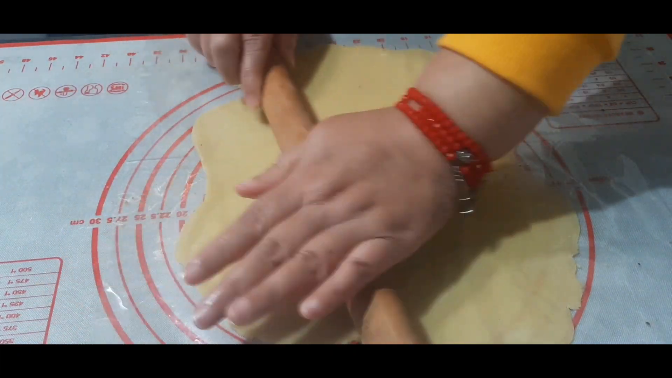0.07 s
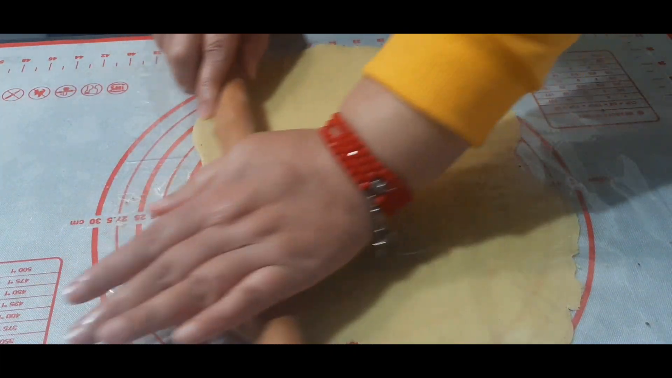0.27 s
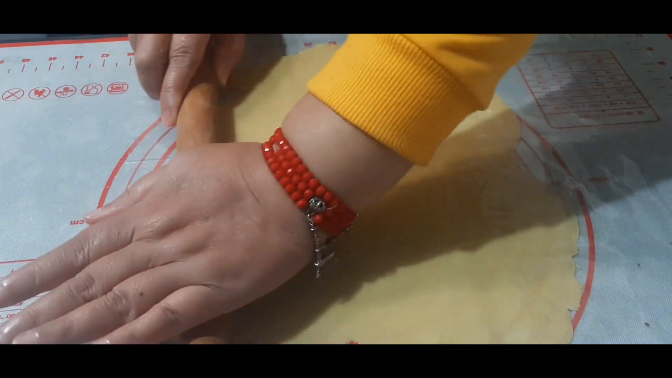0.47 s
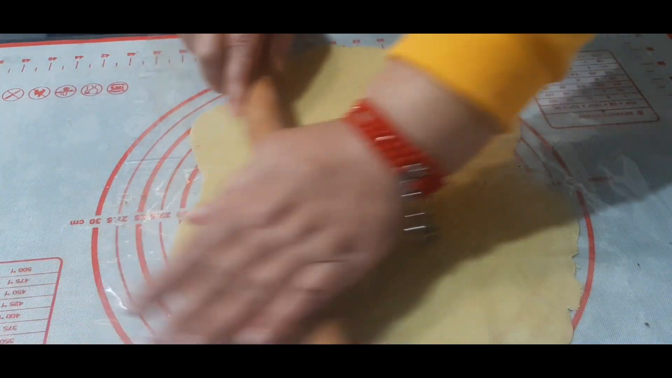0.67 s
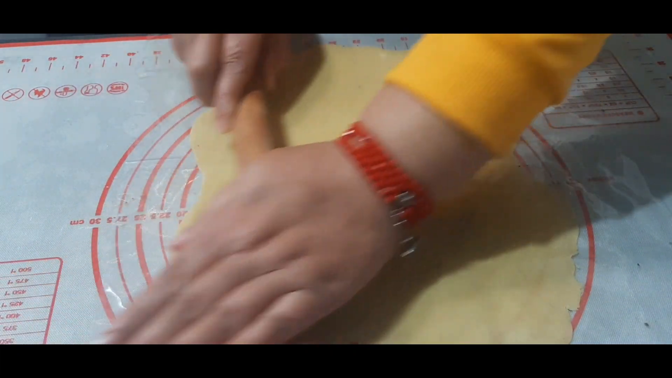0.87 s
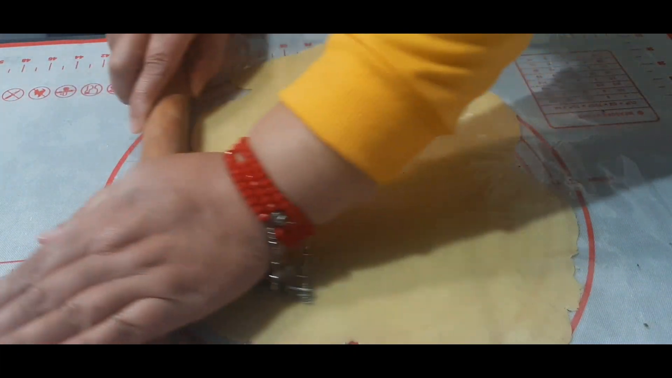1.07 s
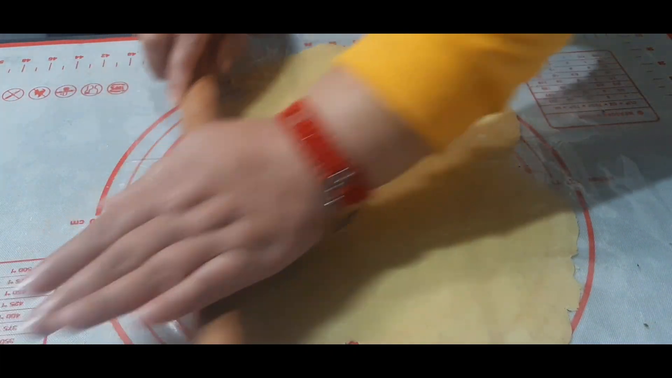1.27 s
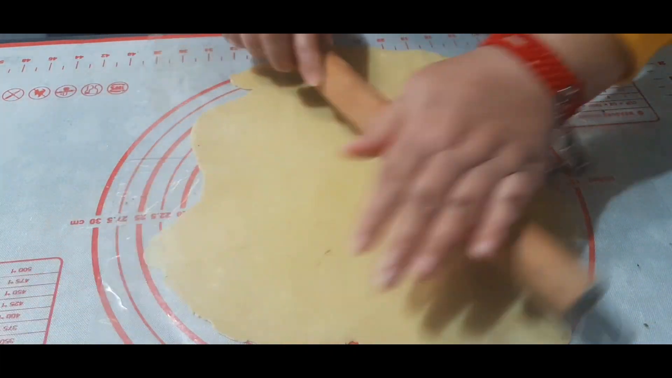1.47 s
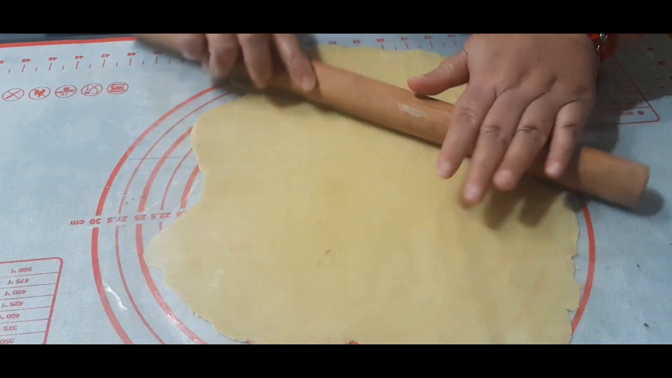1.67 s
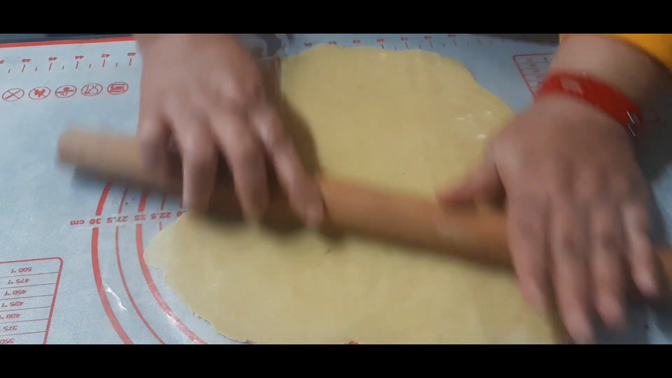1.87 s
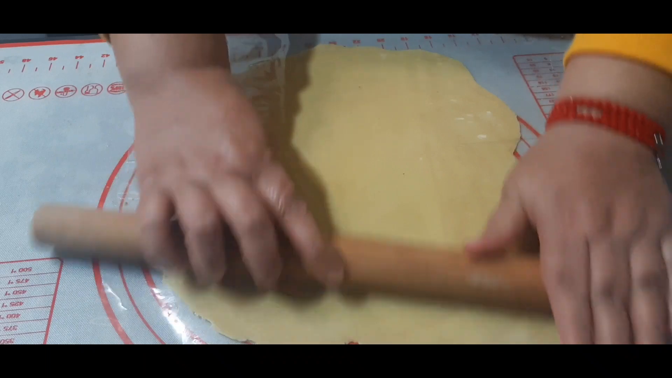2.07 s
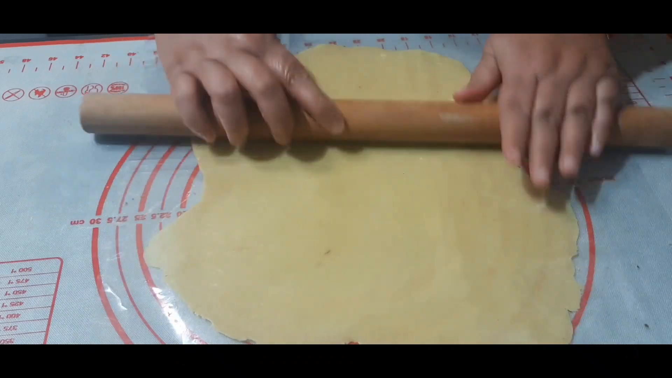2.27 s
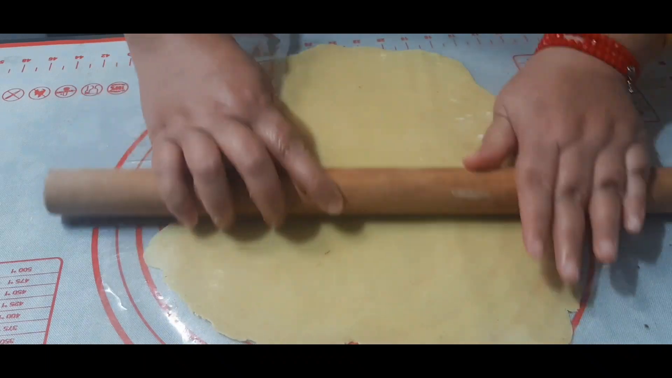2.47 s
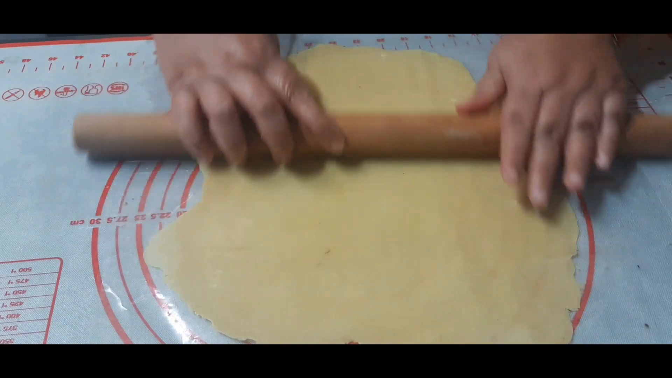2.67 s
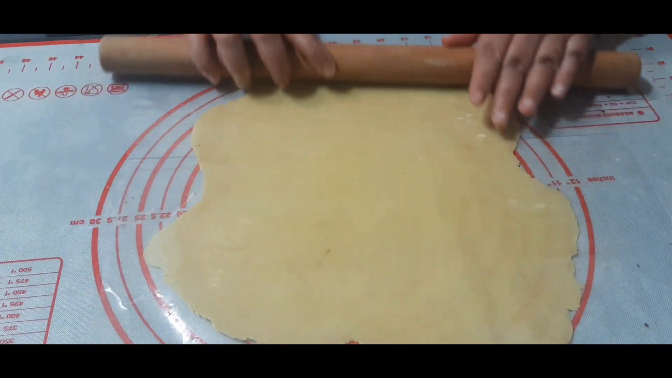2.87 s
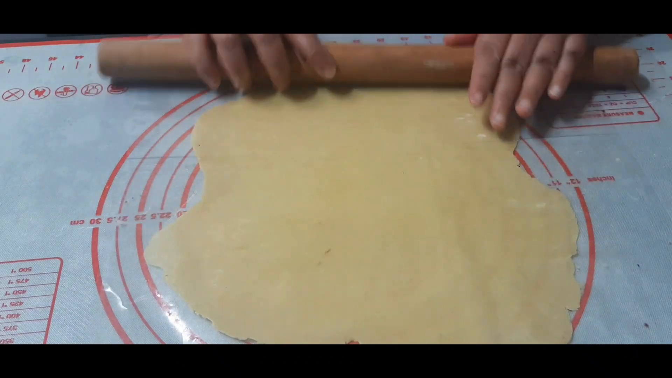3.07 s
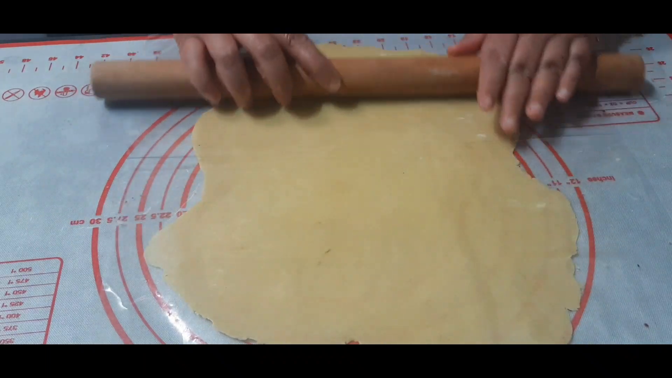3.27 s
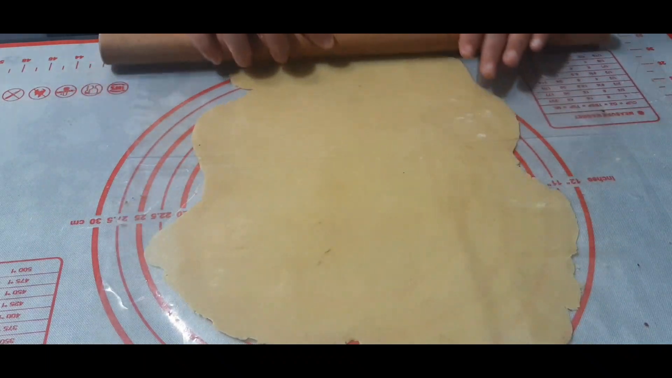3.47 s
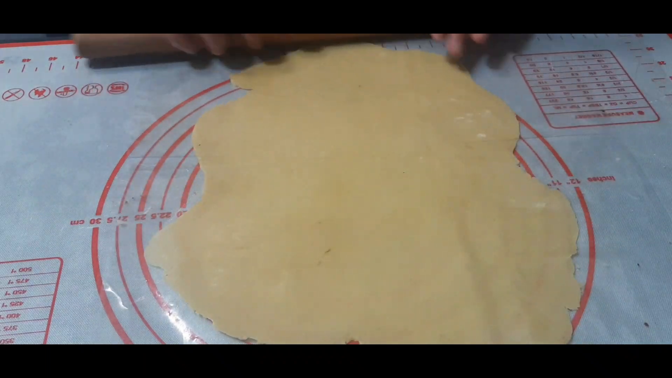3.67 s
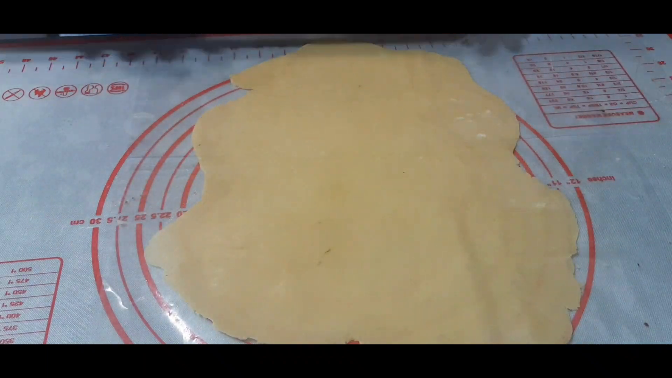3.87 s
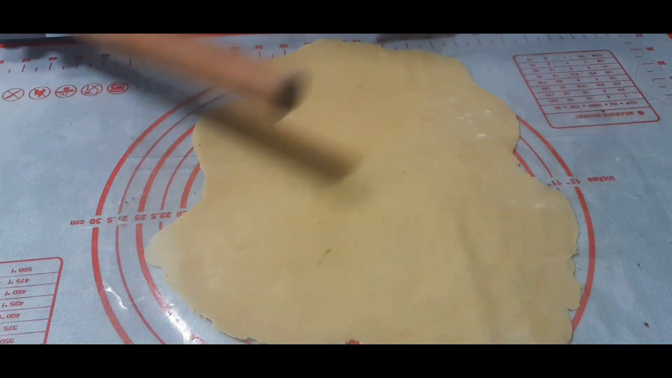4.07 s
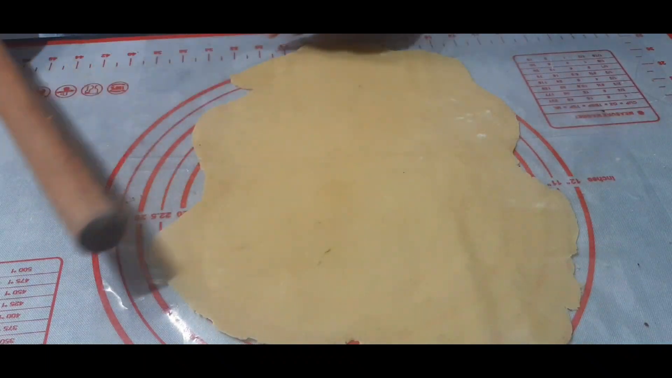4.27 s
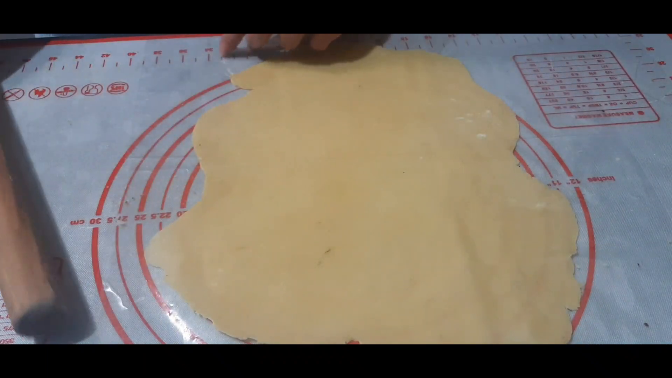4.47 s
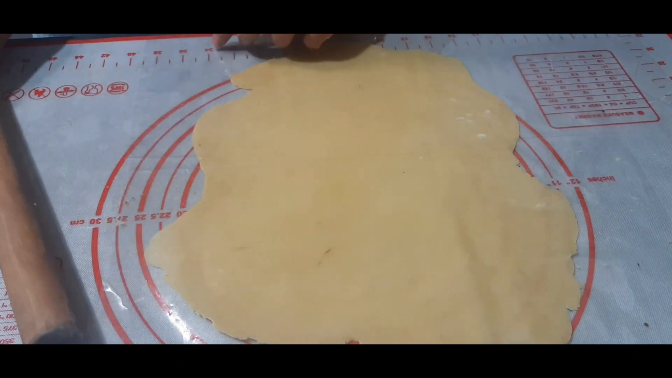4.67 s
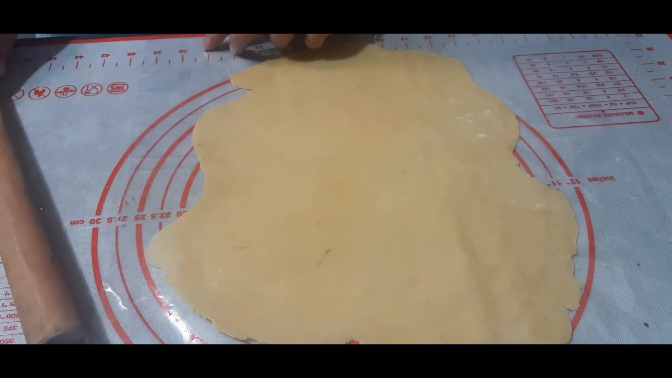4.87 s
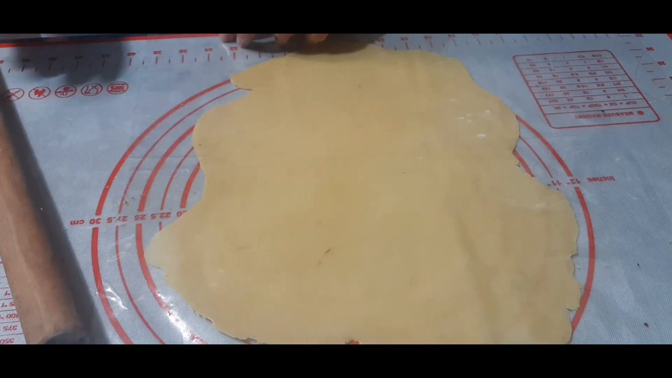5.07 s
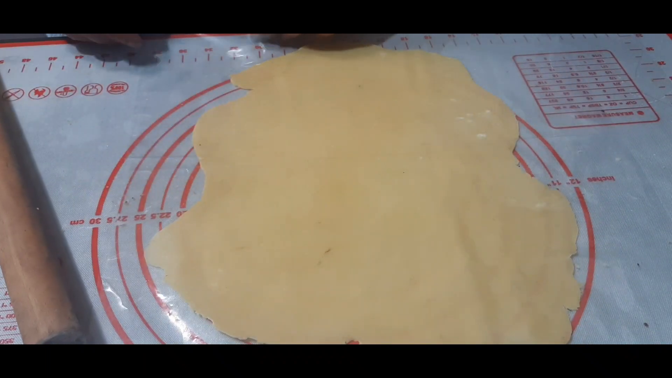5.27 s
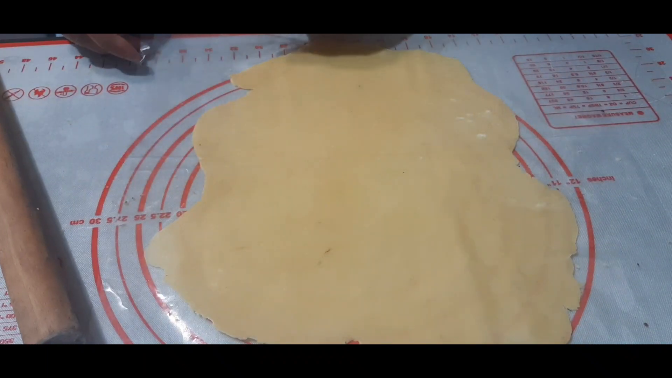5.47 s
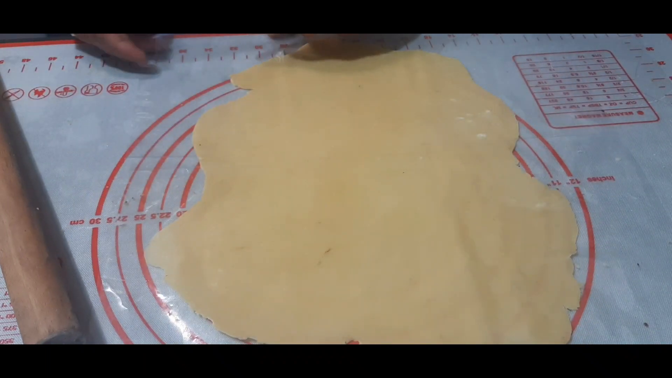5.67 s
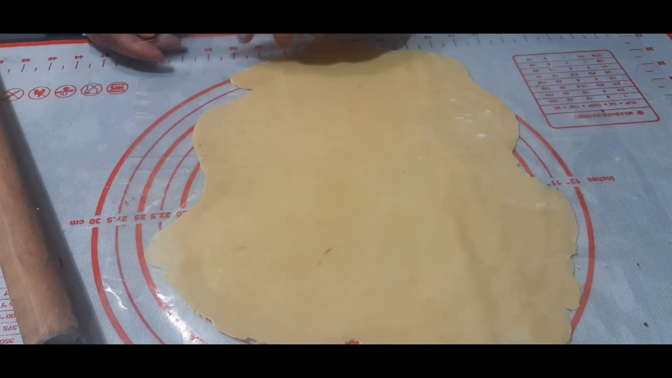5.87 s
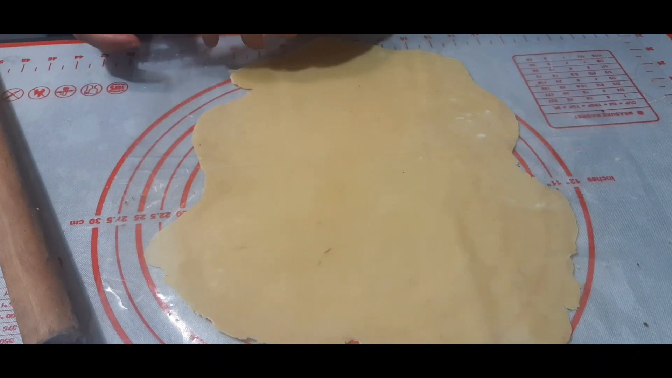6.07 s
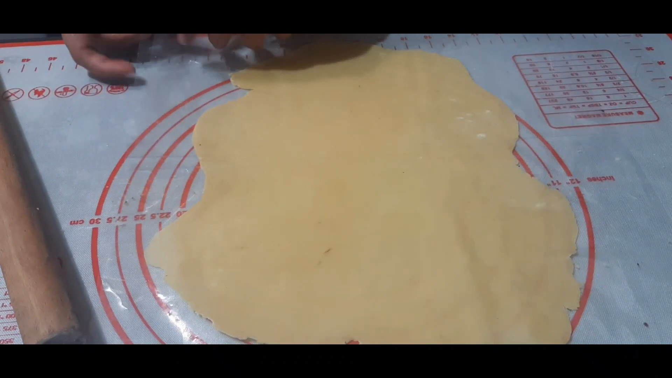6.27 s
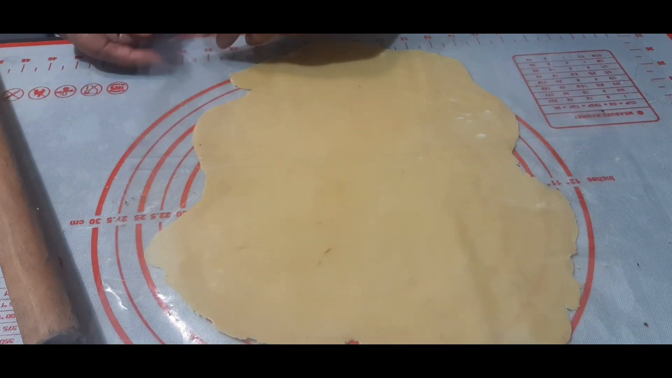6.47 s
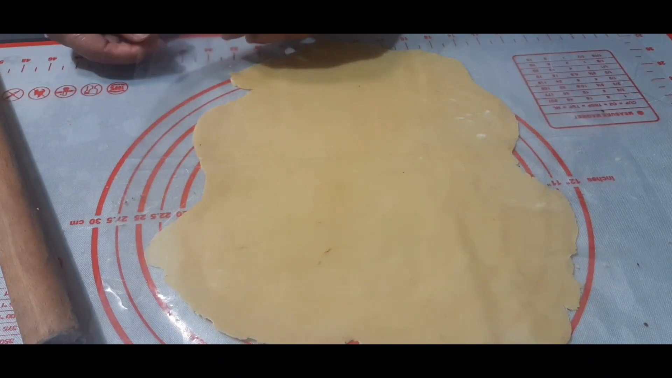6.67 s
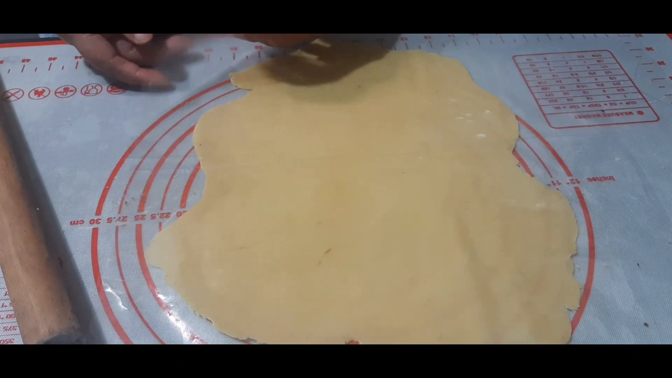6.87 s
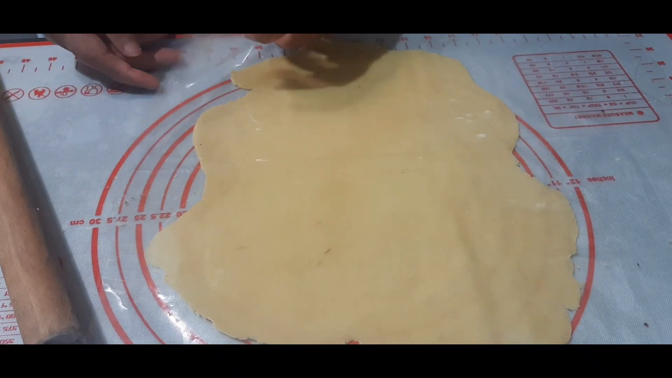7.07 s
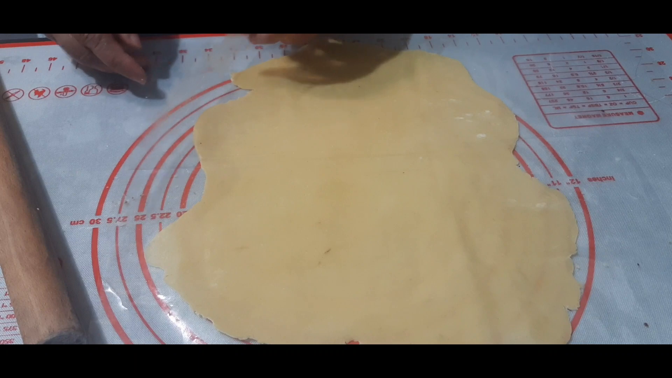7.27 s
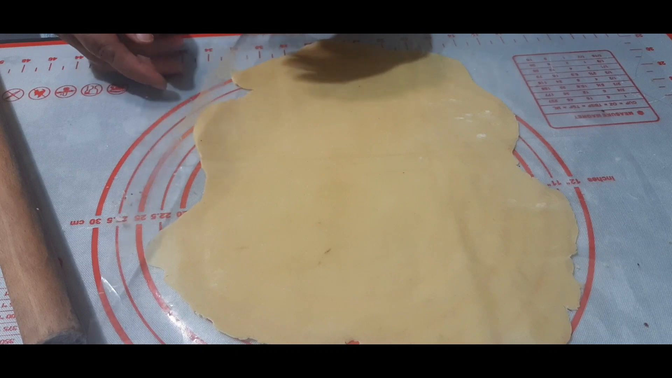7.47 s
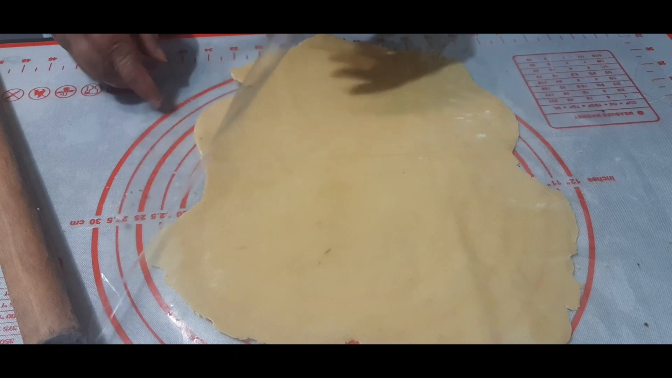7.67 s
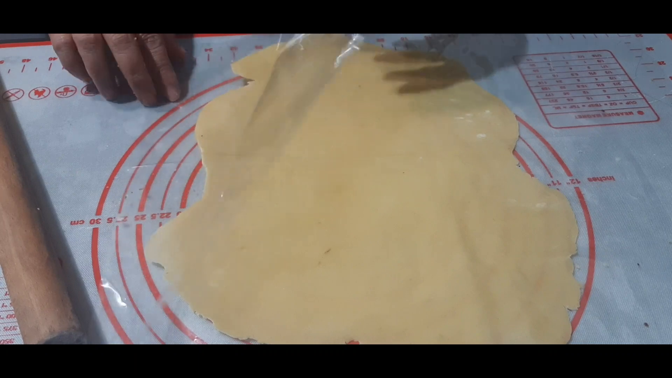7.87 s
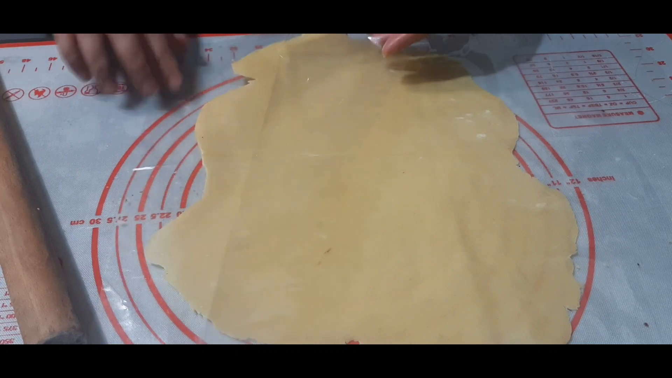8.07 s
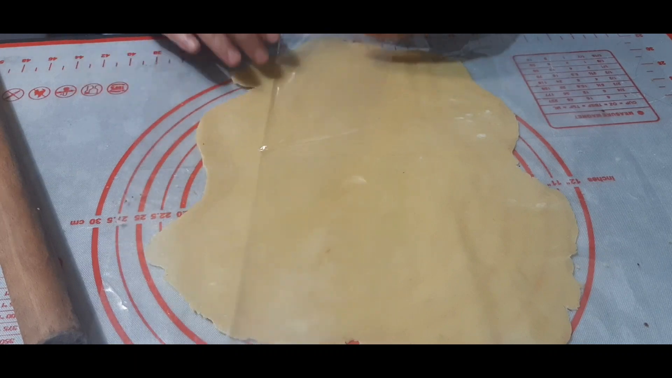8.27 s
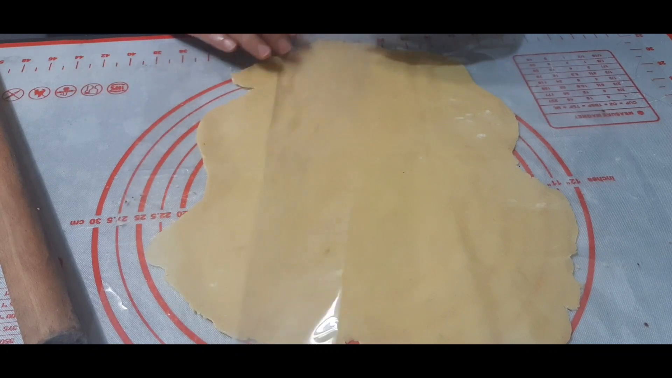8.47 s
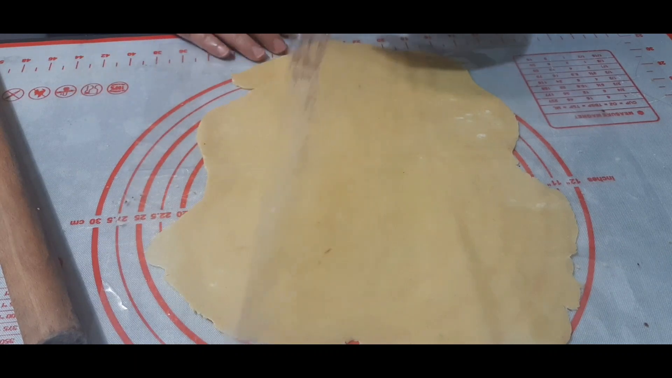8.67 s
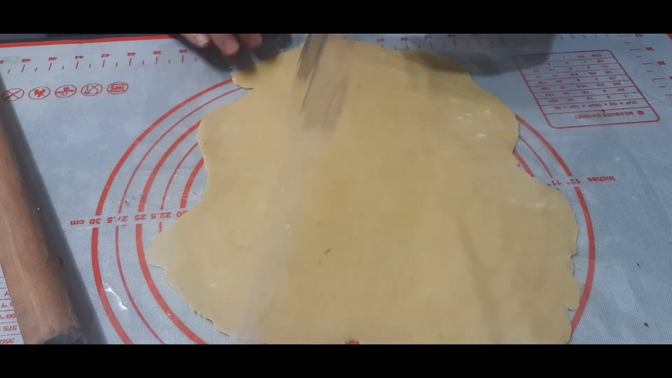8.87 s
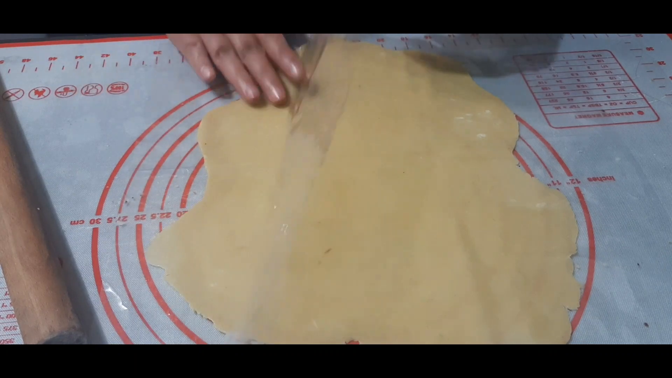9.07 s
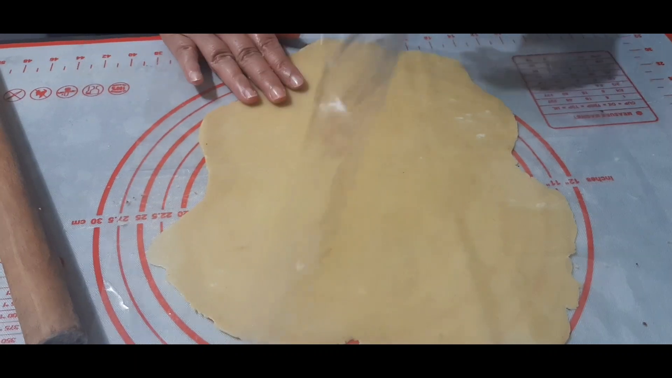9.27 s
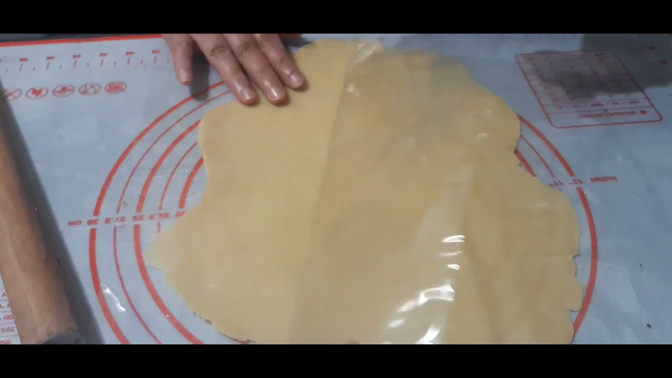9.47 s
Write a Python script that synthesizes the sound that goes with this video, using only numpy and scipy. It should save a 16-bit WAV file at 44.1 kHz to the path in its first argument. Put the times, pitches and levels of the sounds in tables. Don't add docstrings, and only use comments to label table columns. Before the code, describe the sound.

Close to a kitchen worktop, hands roll dough under plastic film: soft skin rubbing, thin hiss, small ticks and an occasional tiny bracelet ting. Sticky film crackles loose in short bursts. A wooden pin is put down with a bouncing, rattling knock, then the film is peeled with sharp irregular snaps and rustles. A faint fridge hum stays underneath in a small hard room, heard by a phone in stereo.

```python
import sys
import numpy as np
from scipy import signal
from scipy.fft import rfft, irfft, next_fast_len
from scipy.io import wavfile
from scipy.ndimage import uniform_filter1d, map_coordinates

SR = 44100
rng = np.random.default_rng(int(sys.argv[2]) if len(sys.argv) > 2 else 0)


def bounce(signal):
    frames = np.transpose(np.atleast_2d(signal))
    limited = np.clip(frames, -1, 1)
    pcm = np.round(limited * 32767).astype(np.int16)
    wavfile.write(sys.argv[1], SR, pcm)


def volts_from_decibels(level):
    exponent = np.asarray(level, float) / 20
    return 10 ** exponent


N = 419832

# start in seconds, peak in dB, centre in Hz, bright edge in dB.
LARGE_CREASES = [(5.2437, -32.5, 2480, -31), (5.3184, -27.5, 2350, -33), (5.4303, -22.5, 2340, -8),
                 (5.485, -43.5, 4730, -14), (5.725, -22.5, 1880, -30), (5.8294, -34.5, 1860, -22),
                 (5.852, -34, 1970, -38), (5.9353, -34, 2460, -20), (6.2164, -30.5, 4800, -22),
                 (6.3902, -27, 5000, -23), (6.4099, -23, 3750, -1.5), (6.6555, -22, 2830, -2),
                 (6.659, -25.5, 2450, 7), (6.816, -28, 2010, 4), (7.0563, -27.5, 2940, -5),
                 (7.341, -23, 4350, 6), (7.436, -27, 6900, -6), (7.5782, -22.5, 5470, -1),
                 (7.6811, -36.5, 1390, -2), (7.692, -29.5, 4720, -21), (7.9467, -31.5, 2350, -9),
                 (7.959, -33, 3980, -10), (8.2732, -30, 4440, -11), (8.3397, -35, 4370, -1),
                 (8.5371, -50, 1420, -21), (8.678, -31.5, 2620, -25), (8.6824, -24.5, 3320, -13),
                 (8.738, -27.5, 3540, 7), (9.0243, -26, 3700, 2.5), (9.0796, -23.5, 3730, -2.5),
                 (9.2931, -25, 3600, -18), (9.298, -36, 8000, 0), (9.2705, -34.5, 6000, -8),
                 (9.3778, -30.5, 1910, -23), (9.3805, -32, 3530, -21)]
# start in seconds, peak in dB, centre in Hz, bright edge in dB.
PIN_TICKS = [(0.136, -38, 12640, -9.5), (0.175, -31, 9300, 7), (0.2297, -36, 3800, -31),
             (0.2596, -46, 2530, -20), (0.279, -38.5, 5540, -22), (0.308, -46.5, 1540, 6),
             (0.5047, -47, 5100, -12), (0.5865, -46.5, 5030, -26), (0.746, -42, 3040, -10),
             (0.7768, -36.5, 11900, -14), (0.9247, -35.5, 2930, -23.5), (0.99, -40.5, 5700, -18.5),
             (1.0495, -32, 5930, 7), (1.086, -29.5, 10300, -18.5), (1.409, -63, 1490, -11),
             (1.5728, -27, 8200, 9), (1.6865, -51.5, 1500, -25), (1.879, -39.5, 1510, -25),
             (1.892, -43, 1420, -25), (1.741, -47, 14800, -20), (1.7619, -37, 1190, 4),
             (1.8187, -41.5, 1440, -18), (1.839, -43, 1500, -20), (3.1808, -50, 1470, -18.5),
             (3.2432, -42.5, 1700, -26), (3.483, -64, 2030, -9), (3.663, -45.5, 1190, -20),
             (4.326, -33.5, 5000, -14), (4.339, -40, 1300, -19), (4.346, -38, 1560, -21),
             (4.734, -40, 6450, -16)]
# start in seconds, peak in dB, centre in Hz.
DULL_FOLDS = [(1.58, -40, 6600), (3.217, -65, 7000), (3.249, -45, 10900), (5.332, -38.5, 2600),
              (6.374, -48, 5900), (6.938, -44.5, 1200), (6.754, -40, 11000), (6.798, -41, 11000),
              (5.42, -51, 11000), (6.5, -45, 12000), (6.537, -51.5, 1500), (8.749, -36, 6000),
              (7.35, -49, 5000), (8.268, -46, 3000), (8.282, -46, 4220), (8.545, -38, 2020),
              (9.11, -34, 2210), (5.016, -47, 1770), (5.0514, -38, 4770), (5.1173, -41.5, 3160),
              (5.284, -52, 4490), (5.519, -32, 2420), (5.6977, -42, 2060), (6.129, -39, 2300),
              (6.4474, -37, 1290), (6.8715, -32, 3620), (6.929, -36, 1220), (7.029, -38.5, 1100),
              (7.044, -36.5, 4130), (7.2397, -38.5, 1540), (7.3983, -39, 1520), (7.41, -35.5, 1520),
              (7.5266, -32.5, 4400), (7.843, -48, 1520), (8.0681, -38.5, 6200), (8.297, -37.5, 4200),
              (8.434, -40.5, 3450), (8.5713, -35, 3780), (8.607, -31.5, 3660), (8.6669, -38, 2680),
              (9.1005, -36, 1490), (9.163, -36, 1400), (9.227, -32, 4400), (9.2612, -38, 2100),
              (9.279, -33.5, 1330), (9.516, -44.5, 2020)]
# start in seconds, peak in dB, centre in Hz.
TINY_CREASES = [(1.616, -38.5, 1670), (1.7948, -34.5, 1150), (2.1443, -37, 1470), (2.155, -45, 1340),
                (2.1804, -50, 2050), (2.1866, -43, 2090), (2.1955, -30, 5140), (2.5594, -64, 1490),
                (2.6404, -46, 1490), (2.8816, -39, 1490), (2.8966, -40, 1570), (3.074, -49, 2030),
                (3.127, -45.5, 1470), (3.2036, -54, 1520), (3.386, -49, 4500), (3.543, -48, 2030),
                (3.5895, -46, 1490), (5.1687, -57, 1500), (5.1804, -44, 1490), (5.3004, -40, 1150),
                (5.4464, -47, 2410), (5.66, -40, 2140), (5.6673, -37, 2060), (5.7355, -20, 2080),
                (5.774, -23.5, 1490), (5.8444, -34, 2100), (6.0425, -34, 2130), (6.106, -47, 1530),
                (6.2436, -44, 1590), (6.366, -54, 1500), (6.4624, -52, 1390), (6.6082, -43, 1490),
                (6.6654, -33, 2370), (6.884, -42, 1150), (7.1276, -34, 1470), (7.224, -41, 1520),
                (7.5894, -44, 5280), (7.7977, -46, 4280), (7.858, -37, 1520), (7.924, -41, 2580),
                (7.9987, -35.5, 1520), (8.0421, -41, 4600), (8.0783, -30.5, 4050), (8.1964, -53, 4500),
                (8.4878, -44, 1430), (8.5556, -39, 1420), (9.2688, -44, 1440)]
# start in seconds, peak in dB, length in seconds, centre in Hz, width over centre.
TEARS = [(1.86, -34, 0.024, 7000, 4.74), (2.215, -25.5, 0.014, 5460, 0.9), (2.273, -26.5, 0.023, 3170, 3),
         (2.24, -44, .008, 9000, 1.7), (2.364, -33.5, 0.013, 5750, 2.9), (2.404, -25, 0.01, 5570, 1.15),
         (2.665, -28, 0.014, 5200, 1.1), (2.698, -23.5, 0.028, 4020, 3.3),
         (4.324, -39.5, 0.097, 3000, 1.36), (5.223, -36, 0.025, 2360, 2.1), (5.479, -45, 0.014, 5460, 1.7),
         (7.052, -29.5, 0.0082, 3450, 2.5), (7.069, -40, .035, 3980, 2), (8.477, -42.5, 0.022, 3300, 2),
         (8.533, -38, 0.0076, 3500, 2), (6.419, -30, 0.011, 4000, 2.3), (5.726, -32.5, 0.044, 2030, 0.33),
         (5.788, -42, 0.034, 2120, 0.32), (5.846, -35, 0.026, 2110, .4), (6.234, -37, 0.041, 3000, 2.2),
         (6.399, -39, 0.028, 3400, 1.5), (6.643, -33, 0.034, 1990, 10.3), (7.273, -35, 0.019, 1550, 3.2),
         (8.678, -42.5, 0.15, 2880, 3.6), (9.007, -43.5, 0.058, 5700, 1.9), (9.092, -34, 0.028, 2260, 3.8)]
# middle in seconds, level in dB, half length in seconds, centre in Hz.
BRUSHES = [(0.404, -63.5, 0.058, 5500), (0.947, -65, .05, 10300), (1.05, -67, 0.12, 5900),
           (1.6, -57.5, 0.016, 5700), (3.15, -65, 0.021, 7700), (3.125, -61.5, 0.032, 12000),
           (3.31, -67, 0.056, 620), (3.28, -67, 0.02, 7400), (4.9, -77, 0.026, 5100),
           (3.5, -61.5, 0.03, 11700), (5.2, -54, 0.017, 2850), (6.1, -57, .01, 14000),
           (4.5, -63, 0.0087, 5500), (5.95, -59.5, 0.038, 4300), (2.9, -76, 0.076, 650),
           (2.12, -72, 0.02, 1460)]
# time in seconds, level in dB.
HAND_EFFORT = [(0, -66.5), (1.1, -65.5), (1.3, -69.5), (1.55, -84.5), (1.75, -58.5), (2.06, -65),
               (2.3, -57.5), (2.57, -64), (3.02, -68.5), (3.7, -61), (4.28, -88), (4.96, -76.5),
               (5.27, -61), (7.62, -63), (8.24, -72), (8.72, -57), (8.99, -88), (9.52, -81)]
# peak in seconds, fade in seconds, level in dB.
PRESSES = [(1.07, 0.12, -68), (1.68, 0.39, -75.5), (1.9, 0.13, -63.5), (2.21, 0.21, -57.5),
           (2.43, 0.04, -53), (2.7, 0.28, -64.5), (3.3, 0.33, -73), (3.68, 0.12, -91), (4.55, 0.59, -64),
           (5.22, 0.2, -69.5), (6.06, 0.026, -71), (6.25, 0.08, -63.5), (7.07, 0.042, -54),
           (7.29, 0.2, -61), (7.5, 0.7, -66), (8.29, 0.09, -68), (8.49, 0.061, -85), (8.68, 0.052, -54.5),
           (9.1, 0.15, -55.5), (9.27, 0.14, -54)]
# frequency in Hz, density in dB per Hz.
SKIN_COLOUR = [(150, -11.5), (300, 0.5), (900, -9), (1500, -5.5), (2100, -6.5), (3200, -13.5),
               (6000, -16.5), (9000, -39), (16000, -23.5)]
# frequency in Hz, density in dB per Hz.
FILM_COLOUR = [(900, -41), (1500, -3), (2200, -10.5), (3500, -5), (6400, -0.5), (9000, -4.5), (13000, -3.5),
               (16500, -7)]
# time in seconds, left lag in samples.
HANDS_LAG = [(0, 1), (1.2, -5), (1.7, 1.5), (2.9, 1.5), (4, 0), (4.5, -7), (5, -5), (7, -5), (7.7, -1),
             (9.5, -1.5)]
# start in seconds, peak in dB, upper modes in dB, slap in dB.
PIN_KNOCKS = [(4.5200, -13.5, -2, -10), (4.531, -26.5, -7, -45), (4.557, -32.5, 4, -42.5),
              (4.5707, -16, -8.5, -43), (4.593, -18, -10, -43), (4.606, -20.5, -18.5, -36),
              (4.617, -29, -13, -37), (4.637, -31, -13, -38), (4.647, -10, -22, 4),
              (4.657, -20.5, -22, -10.5), (4.668, -23.5, -17, -12)]
# frequency in Hz, level in dB, decay (t60) in seconds.
WOOD_MODES = [(290, -30, 0.04), (355, -2, 0.04), (421.5, -1, 0.053), (510, -2.5, .03), (653, -2.5, .025),
              (755, -2, 0.024), (847, -6.5, 0.022), (966, -4, 0.04), (1246, -10, 0.064),
              (1420, -15.5, 0.014), (1680, -11, .025)]
# frequency in Hz, level in dB, decay (t60) in seconds.
UPPER_WOOD_MODES = [(1900, -7, .025), (2040, 2, .04), (2200, -7, .02), (2845, -2, .045), (2960, -8, .025)]
# centre in Hz, width in Hz, level in dB.
SLAP_BANDS = [(480, 357, 4.5), (886, 400, 0), (1700, 1020, 5.5), (3600, 1500, 9), (7200, 1100, 5.5)]
# start in seconds, peak in dB, pitch in Hz.
DOUGH_THUDS = [(1.617, -34.5, 238), (1.6231, -35, 290), (1.632, -53, 546), (1.66, -50, 480),
               (1.68, -38, 194), (2.244, -39, 330), (4.349, -38.5, 286), (5.448, -40, 408),
               (6.406, -37, 506), (6.655, -39, 618), (8.675, -38, 176)]
# start in seconds, peak in dB, lower mode in dB.
CHARM_TINGS = [
    (0.1751, -37.5, 3),
    (0.9348, -50, -20),
    (1.0859, -36, -10),
    (1.408, -62, 4),
    (2.414, -28, -8),
    (3.2503, -39.5, 3.5),
    (3.483, -61, -24),
    (4.3475, -59, -35),
]
# centre in Hz, width in Hz, level in dB.
PHONE_GAP = [(1150, 32, -15), (1490, 62, -0.5), (2060, 33, -3)]
# middle in seconds, level in dB, half length in seconds, pitch in Hz.
PALM_SLIDES = [
    (1.697, -60, 0.012, 1530),
    (3.15, -73, .02, 1490),
    (3.48, -70, .015, 2040),
    (3.55, -67, 0.013, 2050),
    (3.83, -69.5, 0.066, 1490),
    (4.37, -57, 0.014, 1530),
]
# frequency in Hz, t60 in seconds.
KITCHEN_T60 = [(100, 0.44), (400, 0.37), (2000, 0.5), (6000, 0.47), (15000, 0.38)]
# frequency in Hz, level in dB.
WALL_RETURN = [(300, -1), (700, 2), (2000, -2.5), (4000, -1.5), (8000, -2), (14000, -6.5)]
# frequency in Hz, left-right correlation.
PORT_LIKENESS = [(60, 0.75), (300, 0.81), (640, 0.49), (1400, 0), (15000, 0)]
# multiple of the shaft speed, level in dB.
SHAFT_ORDERS = [(3, -79.5), (4, -60.5), (5, -92), (6, -80), (8, -87.5), (10, -81), (30.5, -92)]
# frequency in Hz, density in dB per Hz.
AIR_COLOUR = [(15, -65), (25, -19.5), (107, -13), (194, -7.5), (247, -12.5), (434, -28.5), (484, -27),
              (851, -37.5), (1540, -29), (3100, -43.5), (5610, -36), (9100, -54.5), (15600, -32.5)]
# time in seconds, level in dB.
ROOM_MODE = [(0, -97), (4.2, -84.5), (5, -71), (9.52, -63.5)]
# peak in seconds, fade in seconds, level in dB.
WEIGHT_SHIFTS = [(.93, 0.096, -64), (1.64, 0.072, -58), (2.7, 0.13, -67), (3.07, 0.27, -73),
                 (4.6, 0.52, -61.5), (6.42, 0.16, -54), (6.95, 0.18, -71), (7.27, 0.092, -56),
                 (7.55, 0.2, -70), (8.7, 0.097, -59.5), (9.07, 0.15, -71), (9.41, 0.077, -61)]
# frequency in Hz, level in dB.
PORT_NOTCH = [(7600, 2), (8100, 0.5), (8500, -8.5), (9600, -6), (10800, 0), (12500, 1.5)]
# frequency in Hz, level in dB.
BAND_LIMITS = [(15, -30), (60, 0), (15750, 0), (15900, -32), (16650, -36), (16850, -70)]

TAUT_HZ = 5900


def crease(burst, hz, edge_db):
    edge = np.clip(edge_db, -26, 6)
    crack = unit(filtered(burst[0], lambda f: resonance(hz, 3.94 * hz)(f) ** 2))
    return unit(two_tone(burst, hz, 1.1, edge) + volts_from_decibels(-1.5) * crack)


def snaps(track, table, t60):
    t = np.arange(512) / SR
    for s, db, hz, edge_db in table:
        burst = 0.25 * rng.standard_normal((2, len(t))) * volts_from_decibels(-60 * t / t60)
        burst[:, 0] = rng.choice([-1, 1])
        late = rng.uniform(0.0002, 0.0012)
        snap = filtered(crease(burst, hz, edge_db), lambda f: 1 + 0.3 * np.exp(-2j * np.pi * f * late))
        gain = volts_from_decibels(db) / abs(snap).max()
        add(track[0], s, gain * snap, rng.normal(1, 2.5))
        jolt = (t == 0) * np.ones((2, 1))
        add(track[1], s, gain * crease(jolt, hz, edge_db))


def dull_edge(hz):
    return -10 + 9 * np.log2(hz / TAUT_HZ)


def all_creases():
    folds = np.zeros((2, 2, N + SR))
    snaps(folds, [(s, db + 2, hz, edge_db) for s, db, hz, edge_db in LARGE_CREASES], t60=0.008)
    snaps(folds, [(s, db + 2, hz, dull_edge(hz)) for s, db, hz in DULL_FOLDS], t60=0.008)
    snaps(folds, [(s, db - 7.5, hz, dull_edge(hz)) for s, db, hz in TINY_CREASES], t60=0.015)
    snaps(folds, PIN_TICKS, t60=0.011)
    return folds[..., :N]


def rips(track):
    for s, db, length, hz, share in TEARS:
        edge_db = 14.5 * np.log2(hz / TAUT_HZ) + 2.5 * share
        t = np.arange(round(2 * length * SR)) / SR
        rise = 0.0015 + 0.53 * length * (hz / TAUT_HZ) ** 2
        shape = np.minimum(t / rise, 1) * np.exp(-(t / length) ** 6)
        slip_db = 3 * np.minimum(rng.exponential(size=len(t)), 3)
        volley = shape * rng.standard_normal((2, len(t))) * volts_from_decibels(slip_db)
        add(track, s, volts_from_decibels(db - 17) * two_tone(volley, hz, share, edge_db), 2.5)


def swishes(track):
    for s, db, half, hz in BRUSHES:
        add(track, s - 2 * half, volts_from_decibels(db) * noise_swell(half, hz, 0.4 * hz))


def crackle(spectrum, rate, spread_db, clump):
    chance = rate / SR * np.exp(clump * np.clip(wobble(70), -2, 1.5))
    size = volts_from_decibels(spread_db * np.minimum(rng.exponential(size=N), 3))
    slips = (rng.random(N) < chance) * size * rng.choice([-1, 1], N)
    return unit(filtered(slips, lambda hz: volts_from_decibels(along(spectrum, hz))))


def ring(modes, detune):
    t = np.arange(SR // 5) / SR
    total = 0
    for hz, db, t60 in modes:
        level = volts_from_decibels(db + rng.uniform(-2, 2) - 60 * t / t60)
        total = total + level * np.sin(2 * np.pi * hz * rng.normal(1, detune) * t)
    return total


def slap_response(f):
    flat = sum((-1) ** k * volts_from_decibels(db) * resonance(hz, width)(f) ** 2 for k, (hz, width, db) in enumerate(SLAP_BANDS))
    return (flat + 1.16 * resonance(2400, 5000)(f)) / (1 + (f / 5600) ** 6)


def pin(track):
    t = np.arange(SR // 5) / SR
    for s, db, top_db, slap_db in PIN_KNOCKS:
        jolt = np.exp(-(t / 0.00006 - 3) ** 2) + 0.15 * rng.standard_normal(len(t)) * volts_from_decibels(-60 * t / 0.02)
        jolt = jolt + 2.04 * np.exp(-((t - 0.00061) / 0.00026) ** 2)
        slap = filtered(jolt, slap_response)
        rattle = unit(filtered(rng.standard_normal(len(t)), lambda f: resonance(700, 800)(f) ** 2))
        clatter = volts_from_decibels(-24 - 60 * t / 0.06) * rattle
        onset = np.minimum(t / 0.002, 1)
        shake = 1 + 0.5 * unit(uniform_filter1d(rng.standard_normal(len(t)), size=120))
        wood = ring(WOOD_MODES, 0.022) + volts_from_decibels(top_db) * shake * onset * ring(UPPER_WOOD_MODES, 0.022 / 3)
        wood = wood * np.sin(np.pi / 2 * np.minimum(t / 0.0007, 1)) ** 2
        knock = volts_from_decibels(-9.5) * wood + clatter * onset - volts_from_decibels(slap_db) * slap / abs(slap).max()
        add(track, s, volts_from_decibels(db) * knock, 1.8)


def thuds(track):
    t = np.arange(SR // 6) / SR
    for s, db, hz in DOUGH_THUDS:
        puff = unit(filtered(rng.standard_normal(len(t)), lambda f: resonance(1.6 * hz, 1.6 * hz)(f) ** 2))
        push = np.sin(2 * np.pi * hz * t) * volts_from_decibels(-60 * t * hz / 15)
        thud = push + 0.37 * puff * volts_from_decibels(-60 * t / 0.046)
        add(track, s, volts_from_decibels(db) * thud * (1 - np.exp(-t / 0.0013)), 1.2)


def charm(track):
    t = np.arange(SR // 4) / SR

    def cluster(hz, spread_hz):
        return sum(np.sin(2 * np.pi * (f * t + 0.13 * rng.random())) for f in rng.normal(hz, spread_hz, size=3))

    for s, db, low_db in CHARM_TINGS:
        high = cluster(15480, 110) * volts_from_decibels(-60 * t / 0.11)
        low = cluster(10900, 90) * volts_from_decibels(low_db - 6 - 60 * t / 0.06)
        add(track, s, volts_from_decibels(db - 12) * (high + low), 1.5)


def drones():
    track = np.zeros((2, N))
    for s, db, half, hz in PALM_SLIDES:
        add(track, s - 2 * half, volts_from_decibels(db) * noise_swell(half, hz, 110))
    return track


def phone_gap(x):
    def response(f):
        gap = sum(volts_from_decibels(db) * resonance(hz, width)(f) for hz, width, db in PHONE_GAP)
        return (1j * f / (177 + 1j * f)) ** 2 * (1 + gap)
    return filtered(x, response)


def worktop_lag(x):
    side = np.array([[1], [-1]])
    return filtered(x, lambda f: np.exp(1j * np.pi * f * 0.00027 / (1 + (f / 1720) ** 4) * side))


def kitchen(x):
    out, step = np.zeros((2, N + SR)), SR // 8
    for start in range(0, N, step):
        hz, t, z = signal.stft(rng.standard_normal((2, SR // 2)), SR, nperseg=256)
        turn = likeness_angle(hz)[:, None]
        z = np.cos(turn) * z[0] + np.array([1, -1])[:, None, None] * np.sin(turn) * z[1]
        decay = volts_from_decibels(-60 * t / along(KITCHEN_T60, hz)[:, None])
        tail = signal.istft(z * decay, SR, nperseg=256)[1]
        tail = tail * np.minimum(0.15 + np.arange(tail.shape[1]) / (0.0046 * SR), 1)
        answer = signal.fftconvolve(x[:, start:start + step], tail / np.linalg.norm(tail[0]), axes=1)
        out[:, start + 130:][:, :answer.shape[1]] += answer
    return filtered(out[:, :N], lambda hz: volts_from_decibels(along(WALL_RETURN, hz)))


def fridge():
    shaft_hz = 49.34 * (1 + 0.00069 * wobble(1.626))
    turn = 2 * np.pi * np.cumsum(shaft_hz) / SR
    lean = np.array([[1], [-1]])
    hum = 0
    for k, db in SHAFT_ORDERS:
        level = volts_from_decibels(db + 2.5 + 0.51 * wobble(6.1) + 1.2 * lean)
        hum = hum + level * np.sin(k * turn + 0.19 * lean)
    return hum


def room_boom():
    gain = volts_from_decibels(curves(ROOM_MODE)[0]) + swells(WEIGHT_SHIFTS, 0.72)
    phase = 2 * np.pi * np.cumsum(79 + 5 * wobble(16)) / SR
    tone = unit(volts_from_decibels(4 * wobble(11)) * np.sin(phase))
    noise = rng.standard_normal(N) + 0.35 * rng.standard_normal((2, N))
    return gain * volts_from_decibels(-1.5) * (tone + 0.76 * unit(filtered(noise, resonance(52, 45))))


def unit(x):
    return x / np.sqrt(np.mean(x ** 2) + 1e-20)


def along(points, hz):
    f, v = np.transpose(points)
    return np.interp(np.log(hz + 1), np.log(f + 1), v)


def curves(rows):
    s, *cols = np.transpose(rows)
    return [np.interp(np.arange(N) / SR, s, c) for c in cols]


def swells(rows, rise):
    t = np.arange(N) / SR
    total = 0
    for s, fade, db in rows:
        phase = np.clip((t - s) / np.where(t < s, rise * fade, fade), -1, 1)
        total = total + volts_from_decibels(db) * np.cos(np.pi / 2 * phase) ** 2
    return total


def wobble(rate):
    return map_coordinates(rng.standard_normal(int(N * rate / SR) + 4), [np.arange(N) * rate / SR])


def filtered(x, response):
    m = next_fast_len(x.shape[-1] + 2048)
    return irfft(rfft(x, m) * response(np.fft.rfftfreq(m, 1 / SR)), m)[..., :x.shape[-1]]


def resonance(hz, width_hz):
    return lambda f: 1j * f * width_hz / (hz * hz - f * f + 1j * f * width_hz)


def two_tone(x, hz, share, edge_db):
    body = filtered(x[0], lambda f: resonance(hz, share * hz)(f) ** 2)
    edge = filtered(x[1], lambda f: resonance(11000, 14000)(f) ** 2)
    return unit(body) + volts_from_decibels(edge_db) * unit(edge)


def noise_swell(half, hz, width_hz):
    swell = np.hanning(round(4 * half * SR))
    return swell * unit(filtered(rng.standard_normal(len(swell)), lambda f: resonance(hz, width_hz)(f) ** 2))


def likeness_angle(hz):
    return np.arccos(np.clip(along(PORT_LIKENESS, hz), -1, 1)) / 2


def pair(spectrum):
    def response(hz):
        turn = likeness_angle(hz)
        return volts_from_decibels(along(spectrum, hz)) * np.array([np.cos(turn), np.sin(turn)])
    mid, side = filtered(rng.standard_normal((2, N)), response)
    return unit(np.array([mid + side, mid - side]))


def add(track, s, sound, pan_db=0):
    track[:, round(s * SR):][:, :len(sound)] += volts_from_decibels(np.array([[0.5], [-0.5]]) * pan_db) * sound


def scene():
    effort_db, = curves(HAND_EFFORT)
    strokes = swells(PRESSES, 0.49)
    rub_gain = volts_from_decibels(-71 + 2.33 * (effort_db + 61.5)) + strokes
    hiss_gain = volts_from_decibels(effort_db) + volts_from_decibels(-9.5) * strokes

    near, torn, wood = np.zeros((3, 2, N + SR))
    rips(torn)
    swishes(torn)
    pin(wood)
    thuds(near)
    charm(near)
    rub = rub_gain * volts_from_decibels(-1) * crackle(SKIN_COLOUR, rate=500, spread_db=4, clump=1.3)
    hiss = hiss_gain * volts_from_decibels(-6) * crackle(FILM_COLOUR, rate=350, spread_db=0.5, clump=1.7)
    near = phone_gap(near[:, :N] + rub + hiss)
    torn, wood = phone_gap(torn[:, :N]), phone_gap(wood[:, :N])
    heard, scattered = phone_gap(all_creases())

    walls = kitchen(near + volts_from_decibels(-3.5) * torn + volts_from_decibels(-1.5) * scattered + volts_from_decibels(-5) * wood)
    near = near + heard + torn
    lag = (curves(HANDS_LAG)[0] + 2.1 * wobble(25)) / 2
    ports = np.array([map_coordinates(near[k], [np.arange(N) - side * lag], order=3)
                      for k, side in enumerate((1, -1))])
    spread = rub_gain * volts_from_decibels(-3) * pair(SKIN_COLOUR) + hiss_gain * volts_from_decibels(-4.5) * pair(FILM_COLOUR)
    background = fridge() + room_boom() + volts_from_decibels(-69) * pair(AIR_COLOUR)
    return ports + worktop_lag(drones()) + worktop_lag(wood) + walls + spread + background


def low_pass(x):
    return signal.sosfilt(signal.butter(12, 16830, fs=SR, output="sos"), x)


def record(dry):
    mix = filtered(dry, lambda hz: volts_from_decibels(along(PORT_NOTCH, hz) + along(BAND_LIMITS, hz)))
    return low_pass(mix)


dry = scene()
out = record(dry)
bounce(out)
```